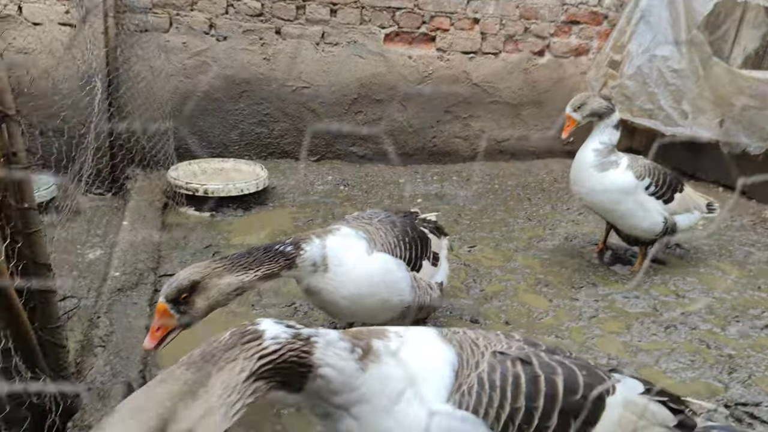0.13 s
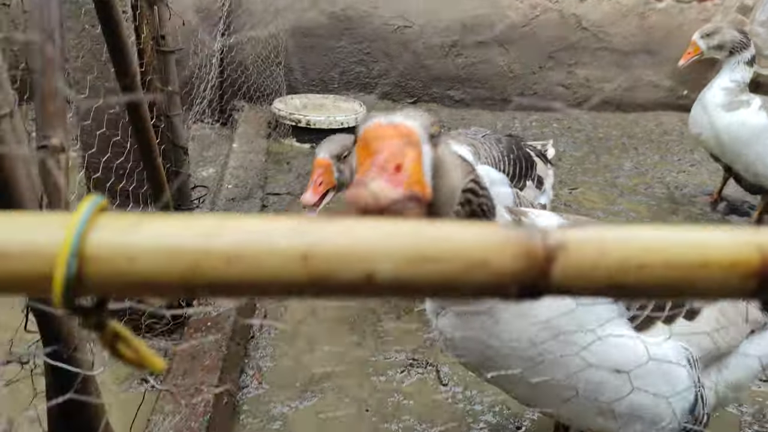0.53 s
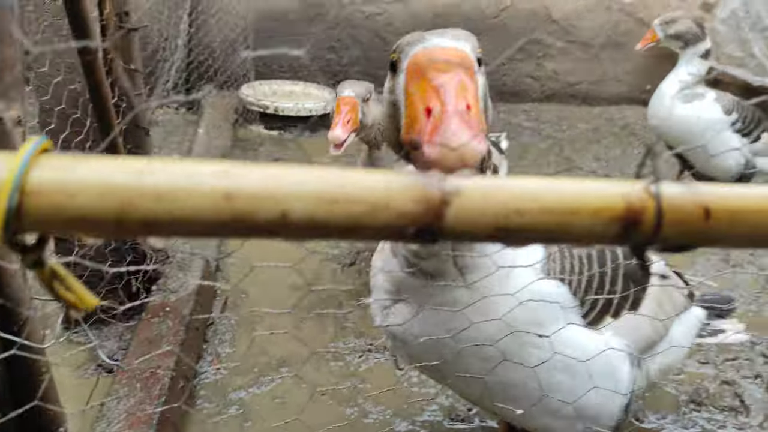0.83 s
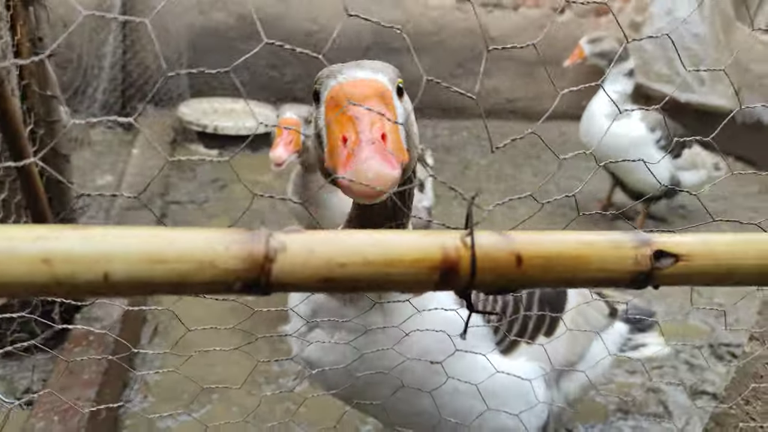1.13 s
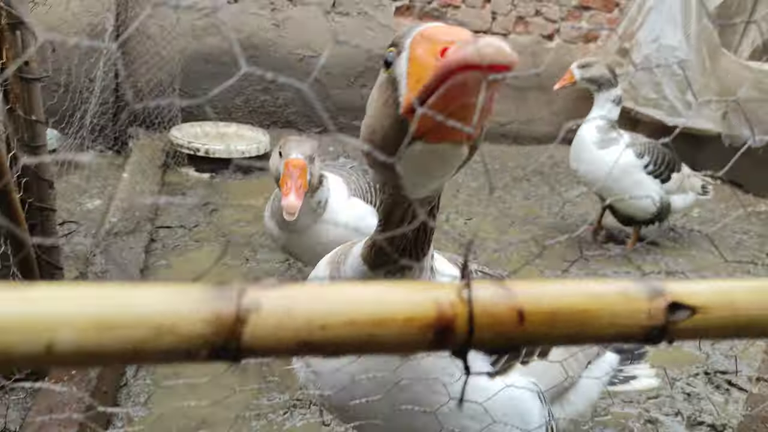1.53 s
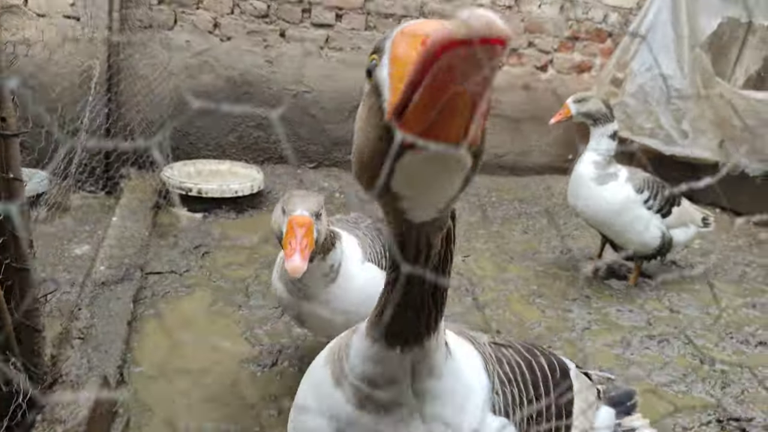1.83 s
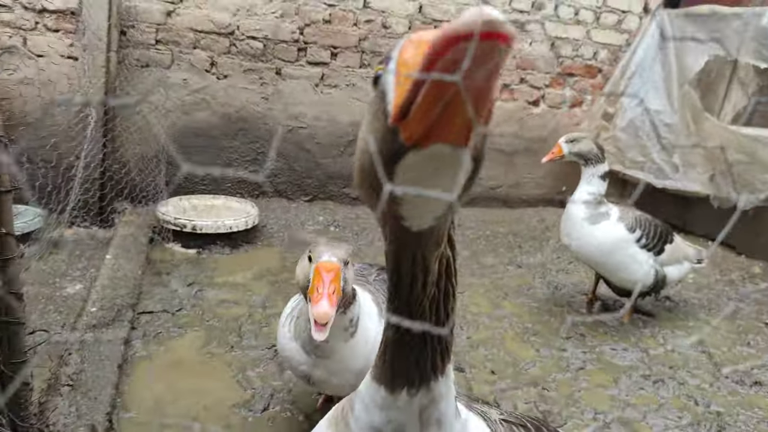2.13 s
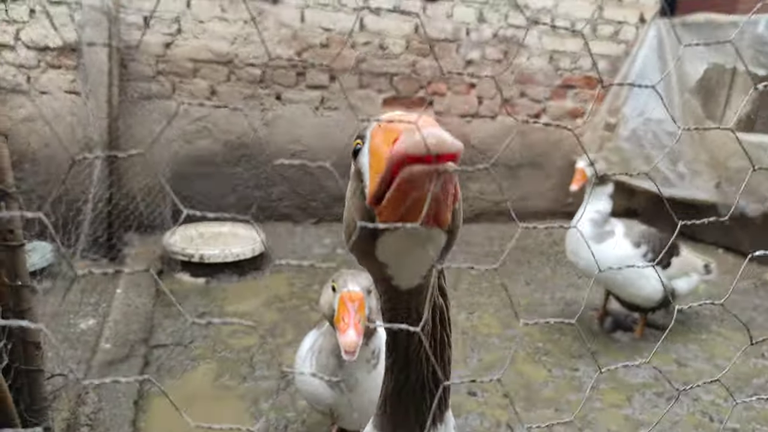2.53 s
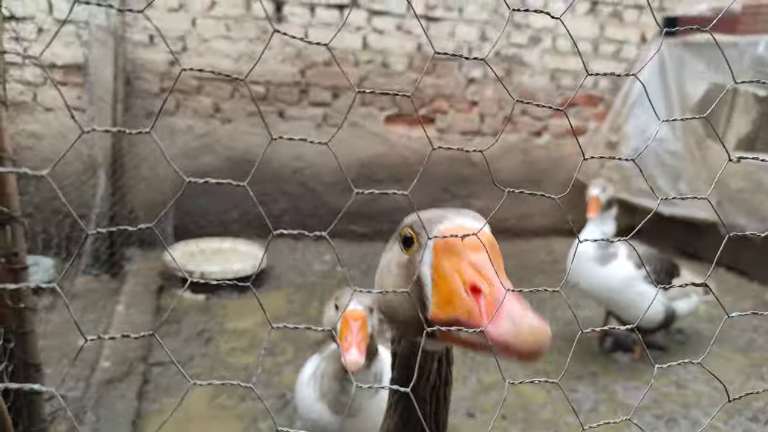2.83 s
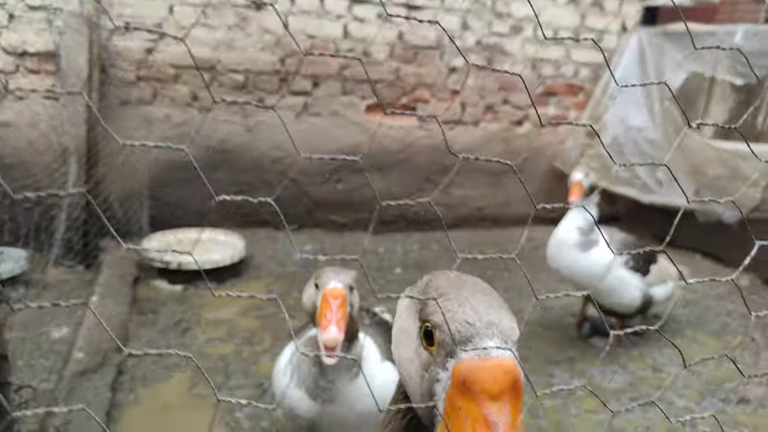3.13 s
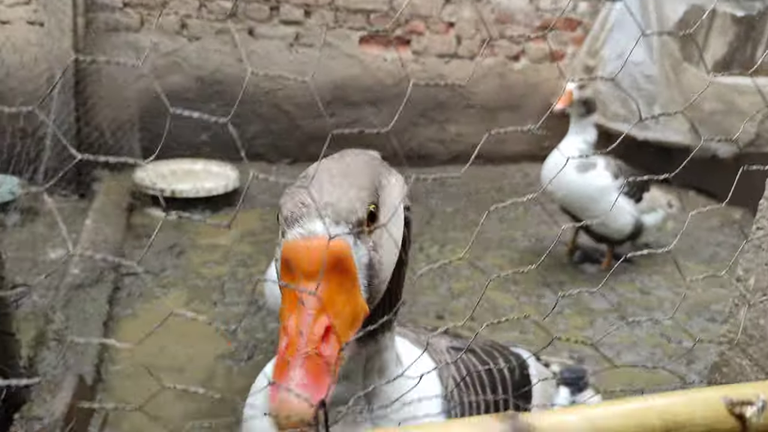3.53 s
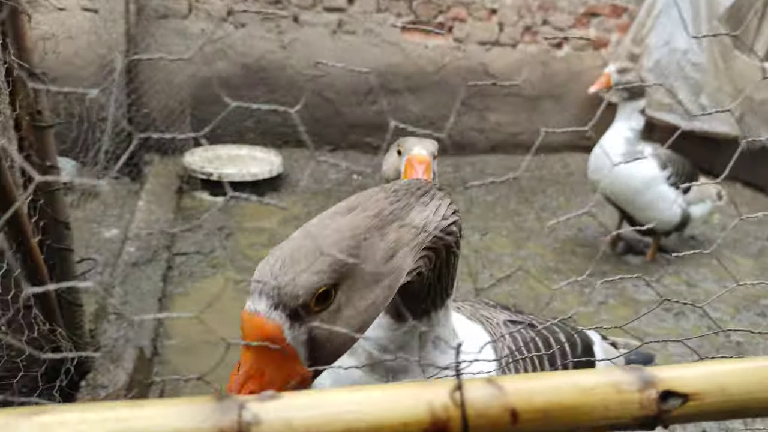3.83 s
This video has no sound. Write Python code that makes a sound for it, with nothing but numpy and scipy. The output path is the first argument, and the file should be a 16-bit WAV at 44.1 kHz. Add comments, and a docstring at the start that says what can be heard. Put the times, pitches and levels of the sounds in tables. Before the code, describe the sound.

Close, nasal goose honks in quick clusters with gliding squeals, in a quiet outdoor pen

```python
"""Geese at a pen fence.

A goose right at the microphone gives buzzy honks, pulse trains through a throat filter, with raspy ends.
Another breaks in with gliding squeals, sums of harmonics on drawn pitch curves. Bent whistles make thin
chirps; bursts of crackly noise make wet steps and feather rustles. Filtered noise is the quiet outdoor
background, and decaying noise gives the fence's echo and the faint tail of the brick walls."""
import sys
import numpy as np
from scipy import signal
from scipy.fft import rfft, irfft
from scipy.io import wavfile
from scipy.ndimage import uniform_filter1d

SR = 44100
rng = np.random.default_rng(int(sys.argv[2]) if len(sys.argv) > 2 else 0)


def dump(signal):
    """Clip the signal to [-1, 1] and save it as 16-bit WAV at the path in sys.argv[1]."""
    limited = np.clip(np.atleast_2d(signal).T, -1, 1)
    pcm = np.round(limited * 32767).astype(np.int16)
    wavfile.write(sys.argv[1], SR, pcm)


N = 176400
T = np.arange(N) / SR
CUTOFF_HZ = 15800
EVEN_S = 0.011  # levelling window


def from_db(db):
    """Decibels to gain."""
    return 10 ** (np.asarray(db) / 20)


def rms_one(x):
    """Scale to unit rms."""
    return x / np.sqrt(np.mean(x ** 2) + 1e-20)


def at_hz(points, hz):
    """Read a spectrum on a log-frequency axis."""
    point_hz, value = np.transpose(points)
    return np.interp(np.log(np.maximum(hz, 1)), np.log(point_hz), value)


def colour(x, points, size=4096):
    """Causal (minimum-phase) filter with the given spectrum, by folding the cepstrum."""
    bin_hz = np.arange(size // 2 + 1) * SR / size
    cepstrum = irfft(np.log(from_db(at_hz(points, bin_hz))))
    cepstrum[1:size // 2] *= 2
    cepstrum[size // 2 + 1:] = 0
    impulse = irfft(np.exp(rfft(cepstrum)))
    return signal.fftconvolve(x, impulse)[:len(x)]


def wander(count, hz):
    """Smooth random motion of unit spread, slower than hz."""
    lowpass = signal.butter(2, hz, fs=SR, output="sos")
    return rms_one(signal.sosfilt(lowpass, rng.standard_normal(count)))


def evened(x):
    """Steady air pressure holds the level from cycle to cycle."""
    size = int(EVEN_S * SR)
    power = uniform_filter1d(uniform_filter1d(x ** 2, size=size), size=size)
    return x / np.sqrt(power + np.mean(x ** 2) / 20)


def add(out, start_s, x):
    """Mix a sound in at a time."""
    i = max(int(start_s * SR), 0)
    out[i:i + len(x)] += x[:max(N - i, 0)]


# Background spectrum. Each row: frequency in Hz, relative density in dB per Hz.
FLOOR_SPECTRUM = [(30, -6.5), (80, -10), (190, -0.5), (400, -10.5), (1100, -16.5), (2000, -24), (4000, -24),
                  (7500, -24), (10000, -38), (15000, -42)]
FLOOR_DB = -53


def background():
    """Quiet outdoor rumble and hiss, partly shared by both sides."""
    shared, left, right = rng.standard_normal((3, N))
    sides = [rms_one(colour(shared + own, FLOOR_SPECTRUM)) for own in (left, right)]
    return from_db(FLOOR_DB) * np.array(sides)


# Honks and short grunts. Each row: start in seconds, length in seconds, level in dB (voice below TREBLE_HZ),
# treble offset in dB, top pitch in Hz before rasp, time of the top in seconds after the start,
# sag in Hz/s^2, least roughness 0-1.
HONKS = [ (.008, 0.18, -21.5, -0.5, 217.3, 0.082, 2170, 0.35),
         (0.24, 0.15, -19, -1.5, 218.4, 0.084, 2830, 0), (0.557, 0.16, -19, 1, 215.2, 0.062, 1694, 0.48),
         (0.707, 0.13, -20, -6.5, 220.7, 0.018, 1900, 0.98), (.789, 0.15, -18, 1, 217.4, 0.047, 1567, 0.4),
         (0.917, 0.077, -16.5, -7.5, 169.5, 0.072, 2100, 0.76),
         (1.09, 0.097, -19, -4.5, 188.9, 0.07, 3000, 0.96),
         (1.290, 0.18, -18.5, 0.5, 206.9, 0.045, 968, 0.3),
         (1.496, .160, -19.5, 3.5, 212.5, 0.083, 3400, 0.39), (2.210, 0.19, -16, -2, 203.1, 0.074, 583, 0),
         (2.407, 0.15, -16, -1, 209.6, 0.067, 967, 0.43),
         (3.132, 0.176, -15.5, -2.5, 205.5, 0.0753, 579, 0.33),
         (3.310, 0.068, -14, -11, 165.5, 0.037, 2000, 0.5),
         (3.355, 0.16, -16.5, -2, 210.7, 0.082, 1837, 0.63),
         (3.55, 0.15, -21.5, -2, 203.4, 0.078, 1485, 0.93),
         (3.725, 0.17, -16.5, -4.5, 207.8, 0.081, 2318, 0.38),
         (3.978, 0.16, -15.5, -7, 213, 0.072, 2040, 0.4)]
# Resonances of the throat. Each row: frequency in Hz, gain in dB.
THROAT = [(70, -60), (150, -35), (420, -21.5), (630, -11.5), (840, 1.5), (1030, -0.5), (1210, 5),
          (1480, -9), (1850, -13), (2400, -13), (2700, -16), (3600, -10.5), (4200, -15), (5300, -11),
          (6300, -15), (7200, -9.5), (8000, -20.5), (9000, -22.5), (9900, -49.5), (13000, -40.5),
          (15500, -74)]
ATTACK_S, RELEASE_S = 0.000989, 0.0097
# the voice catches and lets go: uneven pulses, slower at the catch
RASP_IN_S, RASP_OUT_S, RASP_SLOWS = 0.036, 0.017, 0.17
JITTER, SHIMMER_DB = 0.0614, 3.5  # pulse timing and size spread, scaled by rasp
AIR, AIR_ROUGH, AIR_PULSE_S = 0.14, 0.6, 0.002
SECOND_BEAT_CYCLES, SECOND_BEAT_SIZE = 0.43, 0.41  # weaker slap within each cycle
SLUR_GAP_S = 0.02  # a honk within this gap runs on from the last
HUM_DB, HUM_RISE_S = -9.5, 0.038  # fundamental, radiated by the neck
TREBLE_HZ, TREBLE_FADE_DB, RASP_DULLS_DB = 2030, 9.5, 4  # brightness sinks through a honk and in rasp
RING_HZ, RING_RISE_HZ, RING_DB = 869, 250.2, -4  # windpipe rings at catch and release


def honk(length_s, db, treble_db, top_hz, top_s, sag_hz_s2, rough, slurred):
    """The syrinx slaps open and shut; pulses and puffs of air ring the long throat."""
    t = np.arange(int((length_s + 0.052) * SR)) / SR
    catch = (0.5 if slurred else 1) / (1 + (t / RASP_IN_S) ** 6)
    let_go = np.exp(np.minimum(t - length_s, 0) / RASP_OUT_S)
    edges = np.maximum(catch, let_go)
    rasp = np.maximum(rough, edges)

    hz = top_hz - sag_hz_s2 * (np.minimum(t, length_s) - top_s) ** 2
    if not slurred:
        hz = hz * (1 - RASP_SLOWS * catch)
    cycles = np.cumsum(hz * (1 + JITTER * rasp ** 2 * wander(len(t), 132.6))) / SR

    pulses, puffs = np.zeros(len(t)), np.zeros(len(t))
    for k in range(int(cycles[-1])):
        first_s, second_s = np.interp([k, k + SECOND_BEAT_CYCLES], cycles, t) + ATTACK_S
        size = from_db(SHIMMER_DB * np.interp(first_s, t, rasp) * rng.standard_normal())
        # sinc: band-limited impulse between samples
        pulses += size * np.sinc((t - first_s) * SR)
        pulses += size * SECOND_BEAT_SIZE * np.sinc((t - second_s) * SR)
        puffs += size * (t >= first_s) * np.exp(-abs(t - first_s) / AIR_PULSE_S)
    air = np.clip(AIR + AIR_ROUGH * rasp, 0, 1)
    breath = rms_one(puffs * rng.standard_normal(len(t)))
    source = np.sqrt(1 - air ** 2) * rms_one(pulses) + air * breath

    voice = evened(colour(source, THROAT))
    low = signal.sosfiltfilt(signal.butter(2, TREBLE_HZ, fs=SR, output="sos"), voice)
    treble_gain = from_db(treble_db - TREBLE_FADE_DB * t / length_s - RASP_DULLS_DB * rasp)
    voice = (low + (voice - low) * treble_gain) / low.std()

    hum = from_db(HUM_DB) * np.sqrt(2) * np.sin(2 * np.pi * cycles)
    hum *= np.minimum(t / HUM_RISE_S, 1) ** 2 * (1 - np.clip(rasp, 0, 1) / 2)

    ring_hz = RING_HZ + RING_RISE_HZ * np.sin(np.pi * np.minimum(t / length_s, 1))
    ring_cycles = np.cumsum(ring_hz * (1 + JITTER * (t < length_s) * wander(len(t), 129))) / SR
    ring = from_db(RING_DB) * np.sqrt(2) * edges * np.sin(2 * np.pi * ring_cycles)

    envelope = np.minimum(t / ATTACK_S, 1) * np.exp(-np.maximum(t - length_s, 0) / RELEASE_S)
    return from_db(db) * (voice + hum + ring) * envelope


NEAR_ECHO_DB, NEAR_ECHO_S, NEAR_ECHO_HZ = 5.5, 0.0057, 1930


def scatter(x):
    """The fence close by throws back the treble, differently for each pose of the head."""
    t = T[:SR // 40]
    echo = rng.standard_normal(len(t)) * np.exp(-t / NEAR_ECHO_S)
    highpass = signal.butter(2, NEAR_ECHO_HZ, "high", fs=SR, output="sos")
    echo = signal.sosfilt(highpass, echo / np.linalg.norm(echo))
    return x + from_db(NEAR_ECHO_DB) * signal.fftconvolve(x, echo)[:len(x)]


# Honk stereo balance. Each row: frequency in Hz, left minus right in dB.
BALANCE = [(200, 5.5), (500, 3), (1000, 4), (3800, 0), (7500, -5)]
HONK_LAG_S = 0.00026  # left side later


def balance(left, right):
    """Tilt the honks' two sides against each other by frequency."""
    left_tilt = [(hz, db / 2) for hz, db in BALANCE]
    right_tilt = [(hz, -db / 2) for hz, db in BALANCE]
    return np.array([colour(left, left_tilt), colour(right, right_tilt)])


# Squeals, one curve each. Each row of a curve: time in seconds, pitch in Hz, level in dB,
# roughness (0 smooth, about 1 rough).
SQUEALS = [
    [(.506, 496, -31.5, 0.9), (.54, 704, -13.5, 0.25), (.56, 717, -16, 0.08), (.595, 801, -34, 0.9)],
    [(.705, 1222, -24, 0.93), (.74, 1166, -14, 0.4), (.81, 1072, -20, 0.44)],
    [(.97, 1260, -24.5, 0.7), (1.055, 1406, -20, 0.23), (1.085, 1465, -14, 0), (1.115, 1425, -21, 0.23),
     (1.175, 1130, -17.5, 0.96), (1.25, 780, -29.5, 1.23)],
    [(1.098, 630, -26, 0.32), (1.145, 740, -20, 0.27)],
    [(1.46, 554, -16, 0.44), (1.495, 546.7, -26.5, 0.18), (1.515, 601.4, -12, 0.05), (1.555, 700, -21, 0.1)],
    [(3.515, 886.6, -22, 0.4), (3.59, 1030, -13.5, 0.56), (3.635, 1147, -13.5, 0.45), (3.675, 1084, -15, 1),
     (3.715, 925, -18, 0.52)],
    [(3.61, 1558, -22.5, 0.14), (3.705, 1490, -18.5, 0.01), (3.75, 1496, -24, 0.12),
     (3.83, 1557, -19.5, 0.3)],
    [(3.865, 1920, -41, 0.4), (3.895, 1910, -14.5, 0.01), (3.935, 1884, -56, 0.26)],
]
# Squeal overtone gains. Each row: frequency in Hz, gain in dB.
SQUEAL_THROAT = [(500, 6), (750, -1.5), (1150, 11), (1450, -5), (2200, -3), (2950, -0.5), (3550, 6.5),
                 (4400, -7), (5800, -7.5), (7100, -13), (10000, -44.5)]
SQUEAL_WOBBLE, SQUEAL_WOBBLE_HZ = 0.07, 220
SQUEAL_FLUTTER, SQUEAL_FLUTTER_HZ = 1.0, 160
SQUEAL_DULLS_DB = 8.5  # overtones sink as a squeal turns rough
SQUEAL_LAG_S, SQUEAL_PAN_DB = 0.00011, 1.5


def squeal(curve, count=14):
    """A high, gliding voice whose pitch wobbles and whose level flutters as it turns rough."""
    point_s, *columns = np.transpose(curve)
    t = np.arange(point_s[0], point_s[-1], 1 / SR)
    hz, db, rough = [np.interp(t, point_s, column) for column in columns]
    wobble = 1 + SQUEAL_WOBBLE * rough * wander(len(t), SQUEAL_WOBBLE_HZ)
    phase = 2 * np.pi * np.cumsum(hz * wobble) / SR

    k = np.arange(1, count + 1)[:, None]  # harmonic numbers
    gains = from_db(at_hz(SQUEAL_THROAT, k * hz) - SQUEAL_DULLS_DB * rough * (k > 1))
    gains = gains * (k * hz < CUTOFF_HZ)
    harmonics = gains * np.sin(k * phase + rng.uniform(0, 2 * np.pi, k.shape))
    tone = harmonics.sum(0) / np.sqrt((gains ** 2).sum(0) / 2)

    flutter = evened(1 + SQUEAL_FLUTTER * rough * wander(len(t), SQUEAL_FLUTTER_HZ))
    return from_db(db) * tone * flutter * signal.windows.tukey(len(t), 0.1)


def place(x, lag_s, pan_db):
    """The left microphone hears the sound a little later; positive pan_db makes it louder there."""
    hz = np.fft.rfftfreq(2 * N, 1 / SR)
    left = irfft(rfft(x, 2 * N) * np.exp(-2j * np.pi * hz * lag_s))[:N]
    return np.array([left * from_db(pan_db / 2), x * from_db(-pan_db / 2)])


# Chirps. Each row: start in seconds, length in seconds, level in dB before the arch envelope,
# first, middle and last pitch in Hz.
CHIRPS = [ (1.22, 0.077, -34.5, 4030, 5100, 3830), (1.741, 0.043, -34, 3680, 4530, 4420),
          (2.093, 0.077, -23.5, 3580, 4900, 3640), (2.152, 0.096, -34.5, 3700, 3440, 4040),
          (2.647, 0.075, -35, 5000, 5320, 4100), (2.651, 0.06, -39.5, 2830, 3140, 2470)]
CHIRP_WOBBLE, CHIRP_FLUTTER_DB, CHIRP_PAN_DB = 0.04, 4, 7


def chirp(length_s, db, first_hz, middle_hz, last_hz):
    """A thin whistle that bends through three pitches."""
    u = np.linspace(0, 1, int(length_s * SR))
    hz = np.polyval(np.polyfit([0, 0.5, 1], [first_hz, middle_hz, last_hz], 2), u)
    phase = 2 * np.pi * np.cumsum(hz * (1 + CHIRP_WOBBLE * wander(len(u), 200))) / SR
    arch = np.sin(np.pi * u)
    flutter = rms_one(from_db(CHIRP_FLUTTER_DB * wander(len(u), 110)))
    return from_db(db) * np.sqrt(2) * arch * flutter * np.sin(phase)


# Wet steps and feather rustles. Each row: start in seconds, decay in seconds, level in dB before the decay.
RUSTLES = [(1.975, 0.018, -42), (2.064, 0.051, -39.5), (2.672, 0.036, -50)]
# Rustle spectrum. Each row: frequency in Hz, gain in dB.
RUSTLE_COLOUR = [(300, -17), (2000, -8.5), (7000, 5), (14000, -47)]


def rustle(decay_s, db):
    """A short swell of crackly noise."""
    t = T[:SR // 4]
    grains = rng.standard_normal(len(t)) * from_db(2 * wander(len(t), 300))
    envelope = np.minimum(t / 0.0025, 1) * np.exp(-t / decay_s)
    return from_db(db) * rms_one(colour(grains, RUSTLE_COLOUR)) * envelope


# Wall reflection spectrum. Each row: frequency in Hz, relative gain in dB.
WALL_COLOUR = [(150, 12.5), (900, -7), (2000, 1.5), (7000, 2.5), (14000, 6)]
WALL_DB, WALL_T60_S = -17.5, 0.92


def pen(x):
    """A faint tail between the walls: noise decaying after an 8 ms gap, separate on each side."""
    t, sides = T[:SR], []
    for side in x:
        tail = colour(rng.standard_normal(SR), WALL_COLOUR)
        tail = tail * from_db(-60 * t / WALL_T60_S) * (t > 0.008)
        tail /= np.linalg.norm(tail)
        sides.append(side + from_db(WALL_DB) * signal.fftconvolve(side, tail)[:N])
    return np.array(sides)


def scene():
    """All the birds in the pen, over the background."""
    left, right, squeals, small = np.zeros((4, N))
    last_end_s = -1
    for start_s, length_s, *row in HONKS:
        call = honk(length_s, *row, slurred=start_s - last_end_s < SLUR_GAP_S)
        last_end_s = start_s + length_s
        add(left, start_s + HONK_LAG_S, scatter(call))
        add(right, start_s, scatter(call))
    for curve in SQUEALS:
        add(squeals, curve[0][0], squeal(curve))
    for start_s, *row in CHIRPS:
        add(small, start_s, chirp(*row))
    for start_s, *row in RUSTLES:
        add(small, start_s, rustle(*row))
    birds = balance(left, right)
    birds = birds + place(squeals, SQUEAL_LAG_S, SQUEAL_PAN_DB)
    birds = birds + place(small, SQUEAL_LAG_S, CHIRP_PAN_DB)
    return pen(birds) + background()


def record(dry):
    """Subsonic drift is removed, peaks are rounded and the top is cut."""
    highpass = signal.butter(1, 20, "high", fs=SR, output="sos")
    rounded = 0.86 * np.tanh(signal.sosfilt(highpass, dry) / 0.83)
    lowpass = signal.cheby2(12, 70, CUTOFF_HZ, fs=SR, output="sos")
    return signal.sosfilt(lowpass, rounded)


dry = scene()
out = record(dry)
dump(out)
```